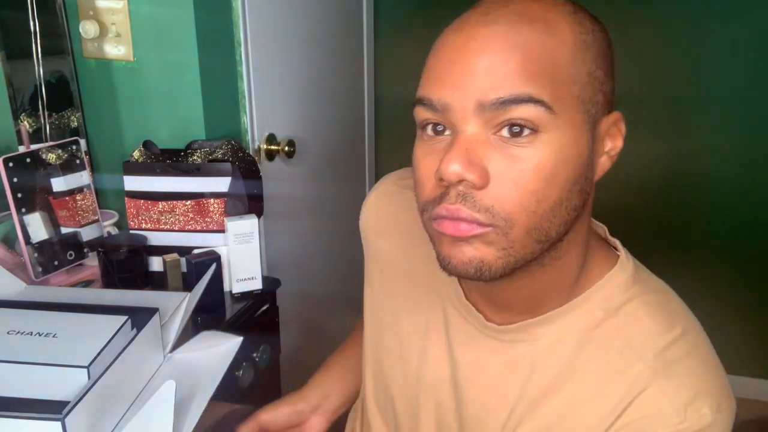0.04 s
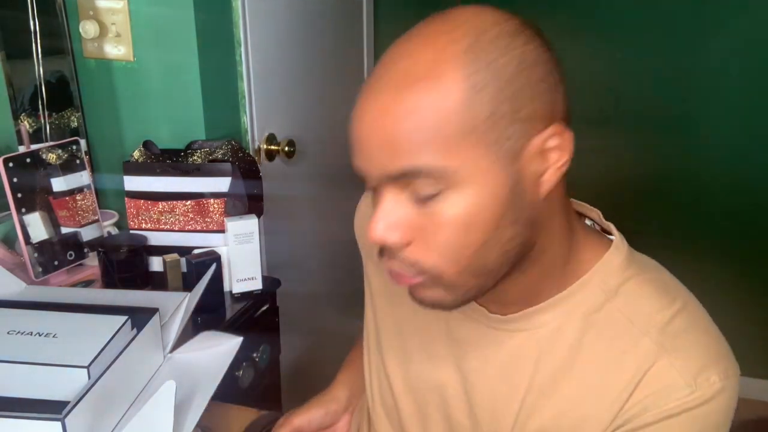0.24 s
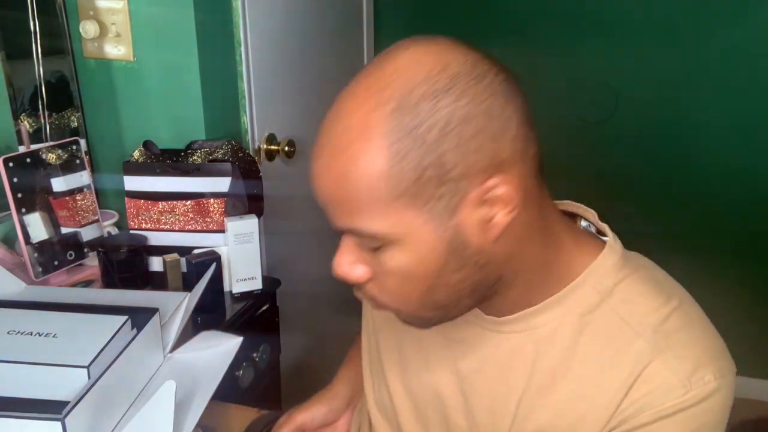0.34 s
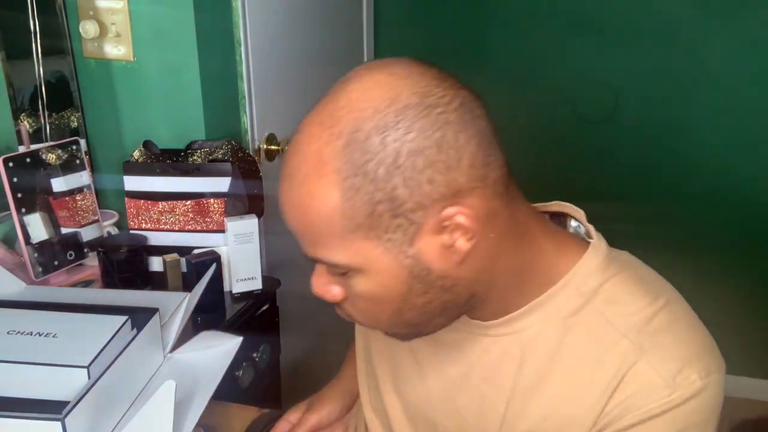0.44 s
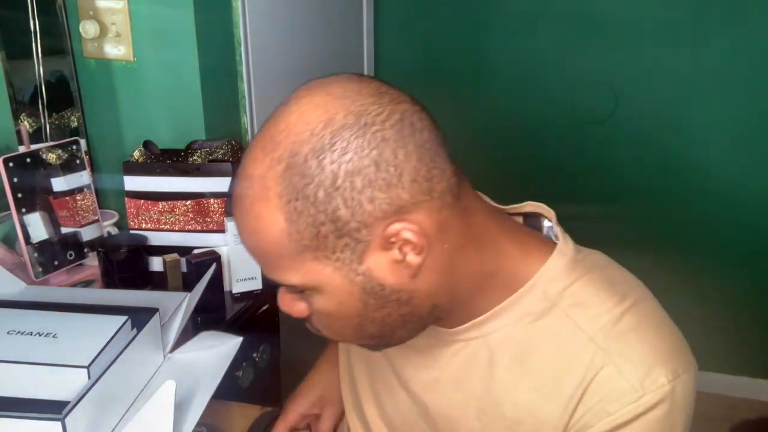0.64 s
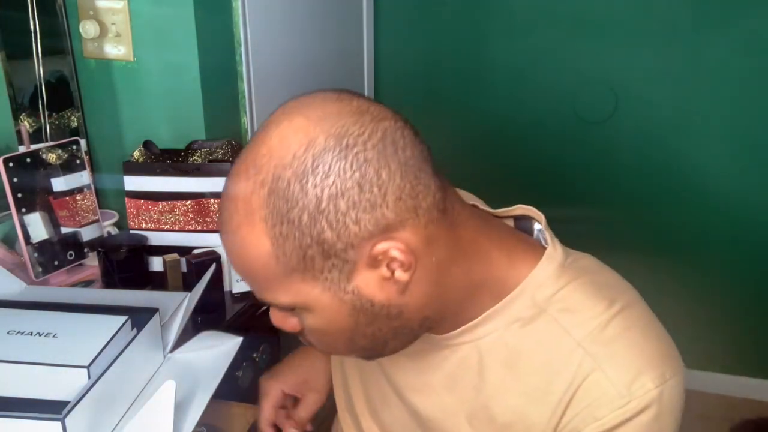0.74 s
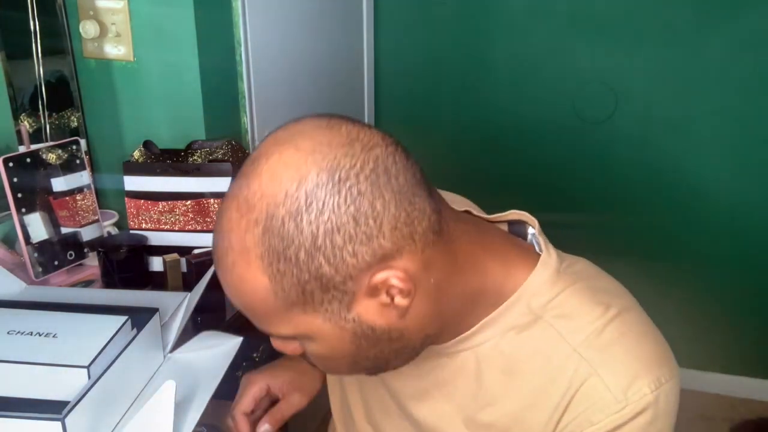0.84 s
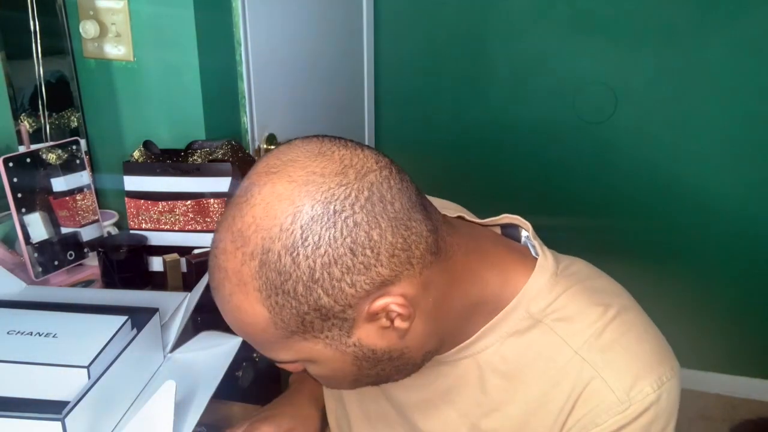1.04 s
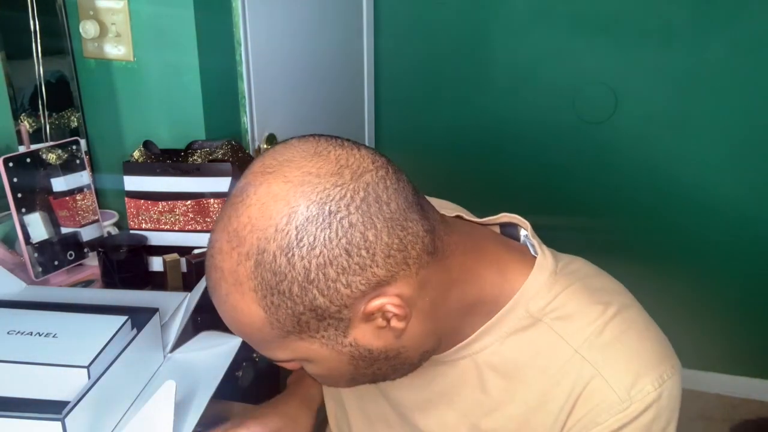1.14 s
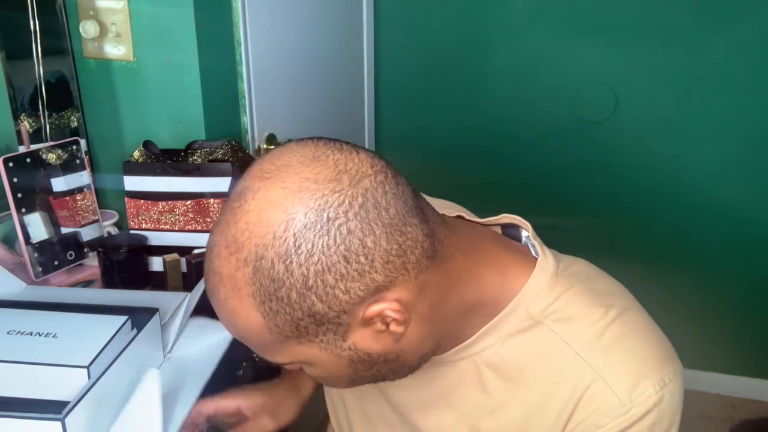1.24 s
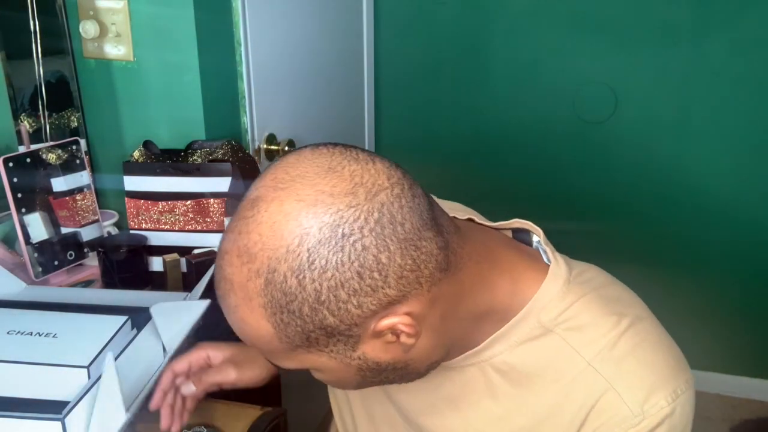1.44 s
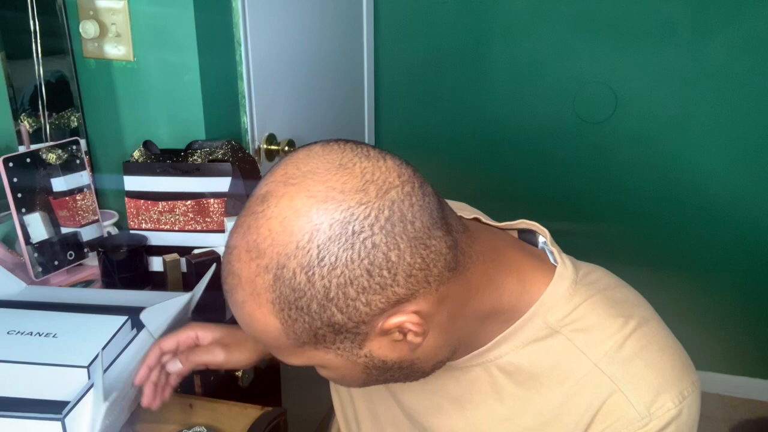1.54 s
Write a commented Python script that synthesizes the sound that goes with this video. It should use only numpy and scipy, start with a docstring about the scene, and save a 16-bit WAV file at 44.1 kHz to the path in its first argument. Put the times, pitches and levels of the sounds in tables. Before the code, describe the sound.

Close stereo pickup in a small indoor room: short wooden scrape, loud drawer bang with low desk shudder, a cluster of softer knocks, faint handling, and finally a bright crackle of wrapping with another knock.

```python
"""Wooden desk drawer slides open and bangs against its stop; a small quiet room, two close microphone ports.
Sliding is filtered grains, rumble and squeak; knocks are touches ringing decaying modes, plus noise cracks.
The stop is a falling tone, the desk's shudder two low tones. Things inside slide and knock on the wood,
then a hand rustles thin wrapping among them: dense filtered grains. Room tail and air are shaped noise."""
import sys
import numpy as np
from scipy import signal
from scipy.fft import rfft, irfft
from scipy.io import wavfile

SR = 44100
rng = np.random.default_rng(int(sys.argv[2]) if len(sys.argv) > 2 else 0)


def file_out(sig):
    """Save sig as 16-bit WAV at sys.argv[1]."""
    # one column per channel
    cols = np.atleast_2d(sig).T
    # limit, then scale
    lim = np.clip(cols, -1, 1)
    pcm = np.round(lim * 32767).astype(np.int16)
    wavfile.write(sys.argv[1], SR, pcm)


N = 70560  # samples

# sliding on wood: (time [s], rub level [dB], rumble level [dB], squeak level [dB], squeak pitch [Hz])
SLIDE = [(0, -44.5, -37, -61, 4620), (.09, -47, -41, -75, 4600), (.14, -46, -39, -61, 4350),
         (.21, -51, -43.5, -69, 4230), (.24, -44, -43, -72, 4360), (.27, -34.5, -28, -87, 4320),
         (.31, -43, -28.5, -91, 4300), (.36, -54, -42.5, -104, 4120), (.43, -60.5, -56, -85, 7100),
         (.48, -57, -64, -70, 6796), (.52, -55.5, -56, -63, 6620), (.55, -53.5, -56, -61.5, 6620),
         (.60, -50.5, -45, -64, 6640), (.66, -48, -47, -89, 6930), (.72, -65, -52.5, -109, 6660),
         (.80, -62.5, -52, -103, 6700), (.86, -69, -83, -103, 6840), (.97, -74, -71, -100, 6770),
         (1.08, -73.5, -62, -101, 6700), (1.2, -77, -48.5, -100, 6740), (1.25, -67, -58, -98, 6700),
         (1.28, -62.5, -47.5, -97, 6800), (1.36, -65, -61.5, -97, 6770), (1.4, -77, -51, -89, 6640),
         (1.47, -65, -56, -87, 5080), (1.52, -62.5, -53.5, -71, 4970), (1.6, -78, -41.5, -77, 5030)]
# spectrum of the rub: (frequency [Hz], relative level [dB per Hz])
RUB_TONE = [(300, -12), (700, -1.5), (1500, -5.5), (3000, -13.5), (6000, -20), (9000, -37.5), (12000, -34),
            (16000, -31)]
# spectrum of the sliding rumble: (frequency [Hz], relative level [dB per Hz])
RUMBLE_TONE = [(25, -15), (50, -4), (90, -4), (170, -3), (350, -12.5), (700, -15.5), (2000, -58.5)]
RUB_GRAINS_PER_S, SQUEAK_WIDTH_HZ = 9000, 900

# knocks: (time [s], peak level of own ring [dB], first pitch [Hz], second pitch [Hz], second re first [dB],
#          ring t60 at first pitch [s], rattle length [s], crack level [dB])
KNOCKS = [(0.052, -31, 479, 698, 4, 0.11, 0, -69), (.088, -35, 2190, 756, -1, .02, 0, -63),
          (0.1425, -35.5, 1310, 3040, 3, 0.012, 0.0028, -41.5),
          (0.1437, -39.5, 5370, 2270, -6, .015, 0.013, -60), (.149, -38, 1390, 2010, -6, 0.031, 0, -62),
          (0.146, -27.5, 468, 718, -2.5, 0.066, 0.0053, -58),
          (0.161, -50, 1300, 4300, -1, 0.046, 0.012, -59),
          (0.235, -27.5, 796, 1200, -21, 0.037, 0.017, -33.5),
          (0.2479, -15.5, 1506, 1294, -13, 0.033, 0.0052, -38.5),
          (.2513, -19.5, 5500, 3840, -3, .012, .0015, -35.5), (0.2502, -6.5, 333, 460, 0, 0.037, 0, -32.5),
          (0.2587, -14, 799, 1450, -9.5, 0.036, 0.0073, -43), (0.269, -17.5, 516, 242, -5.5, 0.029, 0, -43),
          (0.271, -23.5, 145, 800, -17, 0.041, 0.0058, -48), (.2905, -19.5, 130, 540, -7, 0.052, .006, -52),
          (0.299, -26, 300, 800, -3, 0.055, 0.0054, -55), (0.325, -33, 235, 620, -7, 0.052, 0.02, -53),
          (0.484, -37, 1355, 880, 1.5, 0.035, 0, -57), (.487, -41, 299, 229, 0, 0.099, 0.036, -74),
          (.493, -39.5, 891, 1260, -1, 0.19, 0.0057, -64),
          (0.5815, -31.5, 680, 408, 4.5, 0.036, 0.014, -54), (0.589, -30, 643, 1170, -8, .05, 0.0094, -70),
          (.582, -41.5, 1720, 2360, -15, 0.03, 0.014, -81),
          (0.595, -47.5, 950, 1390, -8, 0.048, 0.015, -75), (0.605, -36, 490, 1230, -5, 0.022, .008, -63),
          (0.616, -26.5, 392, 790, 9, 0.018, 0.0048, -54), (.606, -51, 1880, 2350, -19, 0.014, 0.0035, -73),
          (0.629, -26.5, 197, 3060, -34, 0.023, 0.0066, -54),
          (0.642, -34.5, 1307, 2940, -7, 0.06, 0.0075, -44.5),
          (.645, -26, 379, 753, -8.5, 0.069, 0.0005, -63),
          (0.6565, -31.5, 376, 600, -6, 0.032, 0.0084, -71), (0.656, -43, 2000, 3070, -11, 0.068, 0, -67),
          (0.665, -26.5, 347, 1340, -10, 0.06, 0.0013, -83),
          (0.792, -45, 1487, 2500, -2, 0.04, 0.0025, -85), (.80, -57, 2420, 2900, -13, 0.049, 0.021, -85),
          (0.93, -61, 2370, 2085, 1, 0.037, .024, -76), (1.09, -63, 6140, 12300, -6, .03, 0.025, -94),
          (1.2553, -46, 1720, 3130, -11, 0.052, 0.019, -61),
          (1.266, -48.5, 1710, 2250, -11, .045, 0.0096, -64),
          (1.274, -46.5, 1833, 3140, -7, 0.047, 0.012, -71), (1.29, -58, 1750, 3100, 5, 0.017, 0.022, -60),
          (1.275, -50, 5350, 2200, -3, .025, 0.0097, -70),
          (1.266, -35.5, 153, 303, -18, 0.092, 0.0081, -55),
          (1.2985, -30.5, 148, 274, -10.5, 0.028, 0, -73), (1.327, -58, 1600, 3520, 0, 0.013, 0.05, -84),
          (1.352, -56.5, 6290, 2940, -2, 0.045, 0.0065, -77), (1.373, -47, 316, 890, -8, .012, 0.006, -75),
          (1.538, -37.5, 2470, 5200, -1, 0.056, 0.0061, -38),
          (1.548, -25.5, 568, 968, -3, 0.1, 0.0039, -38.5), (1.561, -36, 950, 1860, -12, 0.028, 0, -55),
          (1.572, -32.5, 242, 1780, -1, 0.072, 0.017, -65), (1.558, -29, 224, 330, -4, 0.057, 0.0061, -52)]
# modes of the drawer: (frequency [Hz], relative level [dB])
DRAWER_MODES = [(157, -26), (232, -7.5), (300, 5), (375, 7), (457, -14), (614, -33), (700, 12), (830, -14),
                (1040, -1.5), (1282, -2), (1440, 5), (1560, 8), (1780, 5), (2250, -19.5)]
# spectrum of the knock cracks: (frequency [Hz], relative level [dB per Hz])
CRACK_TONE = [(800, 8), (2000, 3), (3800, -4), (5400, -6.5), (7500, -13), (10000, -11), (13000, -28.5),
              (16000, -21)]
TOUCHES_PER_S, TOUCH_SHARE, RATTLE_FADE_DB = 950, 0.4, 3  # share: later touches re first
DRAWER_DB, DRAWER_T60_S, PITCH_SPREAD_OCT = -11, 0.04, 0.93  # response is 10 dB down at this spread
CRACK_RISE_S, CRACK_T60_S = 0.00044, 0.066
KNOCK_FROM_HZ, KNOCK_APART_DB = 120, -2  # second draw lower: near blows differ less between the ports

STOP_S, STOP_DB, STOP_SWELL_S, STOP_T60_S = 0.2368, -5.5, 0.0086, 0.012
STOP_FROM_HZ, STOP_TO_HZ = 335, 294
DESK_S, DESK_DB, DESK_HZ, DESK_RISE_S, DESK_T60_S = 0.254, -19.5, 71.7, 0.018, 0.19

# rustle of the wrapping: (time [s], level before treble gain [dB], treble gain [dB])
RUSTLE = [(1.253, -100, 1), (1.257, -60, 13), (1.285, -67, 20), (1.31, -68, 16), (1.36, -72, 25.5),
          (1.385, -66, 8), (1.40, -76, 2), (1.445, -73, 7), (1.46, -79, 27), (1.53, -63, 11),
          (1.542, -41, -14), (1.56, -40.5, 16), (1.575, -39, 1), (1.6, -39, 3)]
# spectrum of the rustle before treble gain: (frequency [Hz], relative level [dB per Hz])
RUSTLE_TONE = [(300, -20.5), (600, 7.5), (1000, 7), (1500, -3.5), (2400, 3.5), (3000, 0), (3600, 1.5),
               (4300, -3), (5200, -3.5), (6000, -2), (7000, 2), (8500, -24.5), (10500, 6), (12000, -2.5),
               (14000, -3), (15000, -1.5), (15700, -12), (16200, -22)]
RUSTLE_GRAINS_PER_S, TREBLE_FROM_HZ = 10000, 13500

# decay time of the room: (frequency [Hz], t60 [s])
ROOM_T60 = [(100, 0.31), (500, 0.32), (2000, 0.29), (6000, 0.16), (16000, 0.084)]
# spectrum of room hum and hiss: (frequency [Hz], relative level [dB per Hz])
AIR_TONE = [(25, -35), (45, 6.5), (70, 2.5), (160, -3), (300, -6.5), (500, -11), (900, -24), (1500, -37.5),
            (3000, -40), (6000, -44), (16000, -46.5)]
ROOM_DB, AIR_DB, AIR_WAVER_DB = -12, -47.5, 1.5

# likeness of left and right, clipped to -1..1 in use: (frequency [Hz], correlation [-])
LIKENESS = [(60, 0.94), (200, 0.72), (400, 0.5), (800, 0.031), (1500, 0.19), (3000, -0.13), (5000, -0.28),
            (7000, -0.43), (8200, -1.01), (10200, -1), (10800, -0.6), (11300, 0.41), (12300, 1),
            (16000, .99)]
# balance of the ports: (frequency [Hz], left minus right [dB])
BALANCE = [(60, 1.5), (500, 1), (1200, 0), (3000, -2.5), (8000, 0.5), (12000, -1)]
MIC_FROM_HZ, CUTOFF_HZ, PEAK_TOP = 36, 15900, 0.85


def amp(db):
    """Decibels to amplitude ratio."""
    return 10 ** (np.asarray(db) / 20)


def rms_one(x):
    """Scale to rms 1, over both draws together."""
    return x / np.sqrt(np.mean(x ** 2) + 1e-20)


def in_time(rows):
    """Table columns interpolated to every sample."""
    s, *columns = np.transpose(rows)
    return [np.interp(np.arange(N) / SR, s, c) for c in columns]


def at_log_hz(points, hz):
    """Table read at given frequencies, linear in log frequency."""
    table_hz, values = np.transpose(points)
    return np.interp(np.log(hz), np.log(table_hz), values)


def at_bins(points, size):
    """Table read at the bins of a transform of this size."""
    return at_log_hz(points, np.maximum(np.fft.rfftfreq(size, 1 / SR), 1))


def coloured(x, tone):
    """Impose a spectrum; rms 1."""
    size = x.shape[-1]
    return rms_one(irfft(rfft(x) * amp(at_bins(tone, size)), size))


def filtered(x, order, hz, kind):
    """Causal Butterworth filter."""
    return signal.sosfilt(signal.butter(order, hz, kind, fs=SR, output="sos"), x)


def drift(rate_hz):
    """Slow random variation, rms 1: noise through a double-pole low-pass."""
    r = np.exp(-2 * np.pi * rate_hz / SR)
    noise = rng.standard_normal(N + SR)
    return rms_one(signal.lfilter([1], [1, -2 * r, r * r], noise)[SR:])  # drop the settling


def grains(per_s, spread_db):
    """Random clicks of uneven size, two draws at the same moments."""
    sizes = amp(spread_db * np.minimum(rng.exponential(1, N), 5))
    present = rng.random(N) < per_s / SR
    return sizes * present * rng.standard_normal((2, N))


def ring(x, hz, t60_s):
    """One decaying mode: a two-pole resonator."""
    r, w = amp(-60 / (t60_s * SR)), 2 * np.pi * hz / SR
    return signal.lfilter([0, np.sin(w)], [1, -2 * r * np.cos(w), r * r], x + 1e-18)


def sliding():
    """Grainy friction on wood, its rumble in the desk and a thin uneven squeak."""
    rub_db, rumble_db, squeak_db, squeak_hz = in_time(SLIDE)
    rub = coloured(grains(RUB_GRAINS_PER_S, spread_db=2.0), RUB_TONE)
    rub *= amp(rub_db + 1.6 * drift(22))
    rumble = coloured(rng.standard_normal((2, N)), RUMBLE_TONE)
    rumble *= amp(rumble_db + 3.13 * drift(23.7))
    # narrow noise moved up to the squeak pitch
    a, b = rms_one(filtered(rng.standard_normal((2, N)), 2, SQUEAK_WIDTH_HZ / 2, "low"))
    phase = 2 * np.pi * np.cumsum(squeak_hz) / SR
    squeak = (a * np.cos(phase) + b * np.sin(phase)) * amp(squeak_db + 1.9 * drift(30))
    return rub + rumble + squeak * [[0.9], [1]]


def knocks():
    """Touches ring each thing at two pitches and the drawer's modes near the first; a noise crack dies fast."""
    t, out, crack_gain = np.arange(N) / SR, np.zeros((2, N)), np.zeros(N)
    touches = TOUCH_SHARE * (rng.random(N) < TOUCHES_PER_S / SR) * rng.standard_normal((2, N))
    mode_luck = rng.standard_normal((len(KNOCKS), len(DRAWER_MODES), 2))
    mode_hz = np.array(DRAWER_MODES)[:, 0]
    force = np.zeros((len(DRAWER_MODES), 2, N))
    for (s, db, hz, second_hz, second_db, t60_s, length_s, crack_db), luck in zip(KNOCKS, mode_luck):
        i, rattle = int(s * SR), np.zeros((2, SR // 4))
        n = min(int(length_s * SR) + 2, N - i)
        rattle[:, :n] = touches[:, i:i + n] * amp(np.linspace(0, -RATTLE_FADE_DB, n))
        rattle[:, 0] = 1  # first touch, alike in both draws
        second = ring(rattle, second_hz, t60_s * np.sqrt(hz / second_hz))
        own = ring(rattle, hz, t60_s) - amp(second_db) * second
        scale = amp(db) / np.abs(own).max(axis=1, keepdims=True)
        out[:, i:i + SR // 4] += (scale * own)[:, :N - i]

        near_db = -10 * (np.log2(mode_hz / hz) / PITCH_SPREAD_OCT) ** 2
        mode_gain = amp(near_db[:, None] + 2.0 * luck)
        force[:, :, i:i + n] += mode_gain[:, :, None] * (scale * rattle)[:, :n]

        since = t[i:] - s
        decay_db = crack_db - 60 * np.maximum(since - length_s, 0) / CRACK_T60_S
        crack_gain[i:] += np.clip(since / CRACK_RISE_S, 0, 1) * amp(decay_db)
    for k, (hz, db) in enumerate(DRAWER_MODES):
        out += amp(DRAWER_DB + db) * ring(force[k], hz, DRAWER_T60_S) * (-1) ** k
    out = filtered(out, 2, KNOCK_FROM_HZ, "high")
    return out + crack_gain * coloured(rng.standard_normal((2, N)), CRACK_TONE)


def stop():
    """The front panel swells and sags in pitch as it is pressed, then the contact damps it."""
    since = np.maximum(np.arange(N) / SR - STOP_S, 0)
    pressed = np.minimum(since / STOP_SWELL_S, 1)
    hz = STOP_FROM_HZ + (STOP_TO_HZ - STOP_FROM_HZ) * pressed
    phase = 2 * np.pi * np.cumsum(hz * (since > 0)) / SR
    decay = amp(STOP_DB - 60 * np.maximum(since - STOP_SWELL_S, 0) / STOP_T60_S)
    return pressed * decay * np.sin(phase)


def desk():
    """The desk shudders after the bang: two low tones swell and die."""
    since = np.maximum(np.arange(N) / SR - DESK_S, 0)
    swell = (1 - np.exp(-(since / DESK_RISE_S) ** 2)) * amp(DESK_DB - 60 * since / DESK_T60_S)
    phase = 2 * np.pi * DESK_HZ * since
    return swell * (np.sin(phase) + 1.3 * np.sin(0.73 * phase))


def rustle():
    """Wrapping crackles as dense bright grains; the treble has its own varying gain."""
    level_db, treble_db = in_time(RUSTLE)
    crackle = coloured(grains(RUSTLE_GRAINS_PER_S, spread_db=1.5), RUSTLE_TONE)
    high = signal.butter(4, TREBLE_FROM_HZ, "high", fs=SR, output="sos")
    treble = signal.sosfiltfilt(high, crackle)
    return amp(level_db + 0.4 * drift(60)) * (crackle + (amp(treble_db) - 1) * treble)


def room(x):
    """Reverberation: convolution with noise dying octave by octave."""
    size, edges_hz = SR // 2, 40 * 2 ** np.arange(0, 9.1)
    t, white, tail = np.arange(size) / SR, rng.standard_normal((2, size)), 0
    for low_hz, high_hz in zip(edges_hz, edges_hz[1:]):
        t60_s = at_log_hz(ROOM_T60, np.sqrt(low_hz * high_hz))
        band = filtered(white, 2, [low_hz, high_hz], "band")
        tail = tail + band * amp(-60 * t / t60_s) / np.sqrt(t60_s)
    tail = tail * np.minimum(t / 0.011, 1)  # 11 ms rise
    tail /= np.sqrt(np.sum(tail ** 2) / 2)  # mean energy 1 per draw
    return signal.fftconvolve(x, tail, axes=1)[:, :N]


def air():
    """Room hum and hiss: shaped noise with a wavering level."""
    return amp(AIR_DB + AIR_WAVER_DB * drift(8.5)) * coloured(rng.standard_normal((2, N)), AIR_TONE)


def ports(x):
    """Mix the two draws to left and right with likeness and balance set per frequency."""
    size = N + 4096
    shared, apart = rfft(x, size)
    alike = np.clip(at_bins(LIKENESS, size), -1, 1)
    lean = amp(at_bins(BALANCE, size) / 2)
    mid = np.sqrt((1 + alike) / 2) * shared
    side = 1j * np.sqrt((1 - alike) / 2) * apart  # quarter turn: left leads where the draws agree
    return irfft(np.array([(mid + side) * lean, (mid - side) / lean]), size)[:, :N]


def scene():
    """Sources as two draws, what the ports share and what sets them apart; then room, air and ports."""
    things = sliding() + knocks() * amp([[0], [KNOCK_APART_DB]]) + stop() + desk() + rustle()
    return ports(things + amp(ROOM_DB) * room(things) + air())


def record(dry):
    """The microphone loses the deepest bass and rounds the loudest peaks; the top is cut."""
    x = filtered(dry, 3, MIC_FROM_HZ, "high")
    x = PEAK_TOP * np.tanh(x / PEAK_TOP)
    top_cut = signal.cheby2(14, 70, CUTOFF_HZ + 300, fs=SR, output="sos")  # stopband edge
    return signal.sosfilt(top_cut, x)


dry = scene()
out = record(dry)
file_out(out)
```